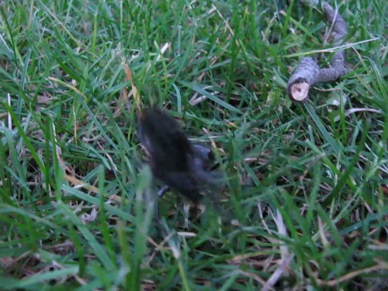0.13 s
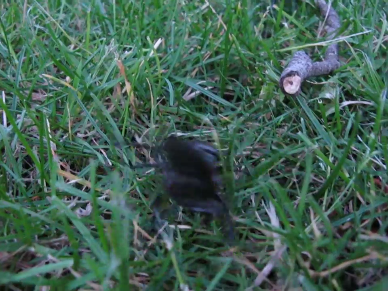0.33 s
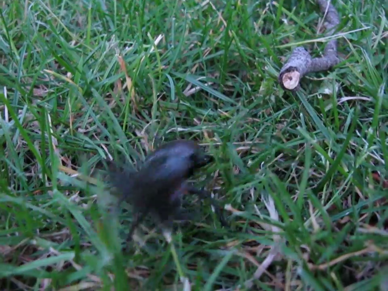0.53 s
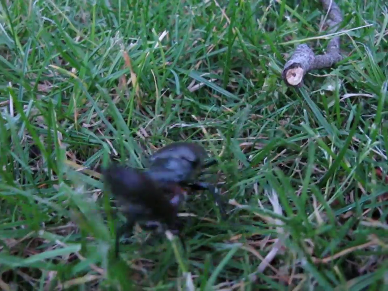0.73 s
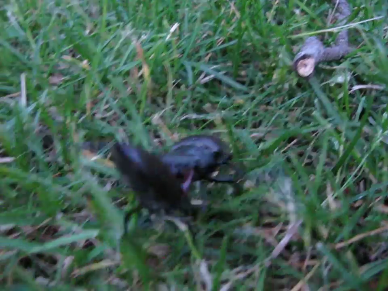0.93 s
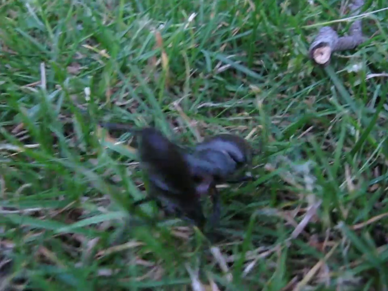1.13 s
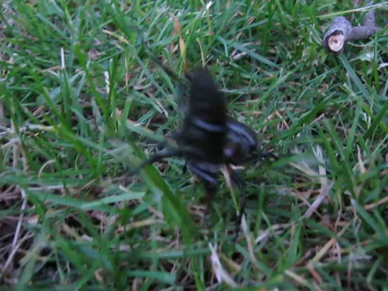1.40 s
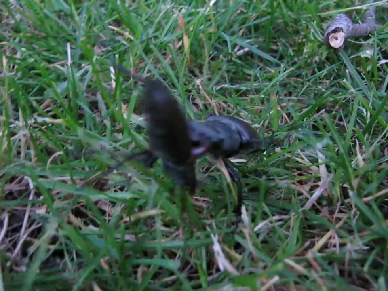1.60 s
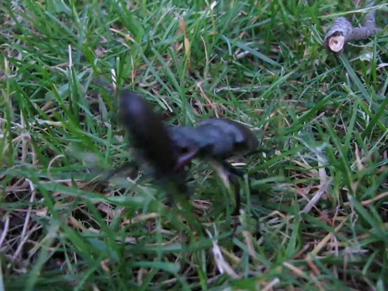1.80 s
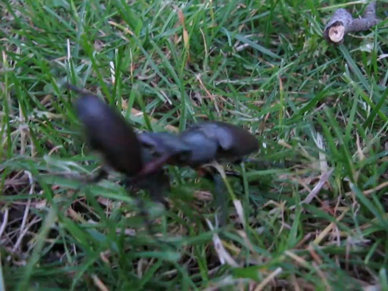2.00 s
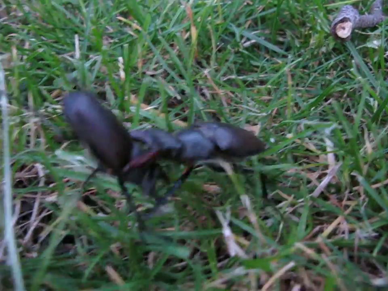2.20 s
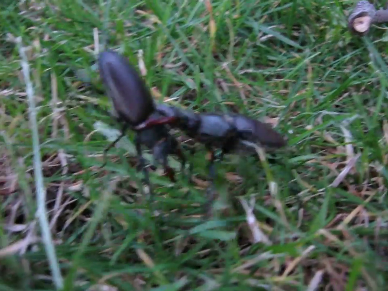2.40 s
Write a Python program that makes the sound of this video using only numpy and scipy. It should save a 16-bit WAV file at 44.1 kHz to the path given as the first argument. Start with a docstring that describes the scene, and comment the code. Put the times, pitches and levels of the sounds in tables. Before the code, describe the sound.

Two beetles knock together sharply once, followed by tiny dry clicks and light grass rustles

```python
"""On a lawn, two stag beetles wrestle close by.
Knocks and clicks are struck shell modes, each rebounding about half to one millisecond later,
with a short noisy scatter and a low noise tail from the turf. Legs snap blades (high damped modes)
and brush the grass (dense random grains).
Behind them lie a soft outdoor hiss of coloured noise and a faint electronic whine of sine tones."""
import sys
import numpy as np
from scipy import signal
from scipy.fft import rfft, irfft
from scipy.io import wavfile
from scipy.ndimage import uniform_filter1d

SR = 44100
rng = np.random.default_rng(int(sys.argv[2]) if len(sys.argv) > 2 else 0)


def unload_wav(signal):
    """Save mono or channel-first audio to the path in sys.argv[1] as 16-bit WAV at rate SR, clipped to [-1, 1]."""
    wavfile.write(
        sys.argv[1],
        SR,
        np.round(np.clip(np.atleast_2d(signal).T, -1, 1) * 32767).astype(np.int16),
    )


N = 112454
T = np.arange(N) / SR  # time in seconds


def undb(db):
    """Decibels to gain."""
    return 10 ** (np.asarray(db) / 20)


def unit(x):
    """Scale to rms 1."""
    return x / np.sqrt(np.mean(x ** 2) + 1e-20)


def colour(x, points):
    """Shape the spectrum of x through (Hz, dB) points joined on a log frequency axis, at rms 1."""
    point_hz, point_db = np.array(points, float).T
    bin_hz = np.maximum(np.arange(N // 2 + 1) * SR / N, 1)
    gain = undb(np.interp(np.log(bin_hz), np.log(point_hz), point_db))
    return unit(irfft(rfft(x) * gain, N))


def noise(points):
    """Coloured noise at rms 1."""
    return colour(rng.standard_normal(N), points)


def walk(rate):
    """A smooth random wander at rms 1, with about `rate` new values a second."""
    hold = int(SR / rate)
    steps = np.repeat(rng.standard_normal(N // hold + 1), hold)
    return unit(uniform_filter1d(steps, hold)[:N])


def decay(start, t60):
    """Silence until start, then a fall of 60 dB in t60 seconds."""
    fall = np.clip((T - start) / t60, 0, 10)
    return (T >= start) * np.exp(-np.log(1000) * fall)


def ring(start, modes):
    """Damped sine modes struck at start."""
    return sum(undb(db) * decay(start, t60) * np.sin(2 * np.pi * hz * (T - start))
               for hz, db, t60 in modes)


def grains(rate, spread_db):
    """Random impulses of either sign at `rate` per second, mostly small and a few large."""
    size_db = spread_db * np.minimum(rng.exponential(size=N), 4)
    size = undb(size_db) * rng.choice([-1, 1], N)
    return (rng.random(N) < rate / SR) * size


def cut(x, hz, kind):
    """A gentle two-pole low-pass or high-pass."""
    return signal.sosfilt(signal.butter(2, hz, kind, fs=SR, output="sos"), x)


# Dull knocks of the hard bodies. Each row: start in seconds, level in dB, pitch ratio,
# treble edge of the first touch in Hz, rebound delay in ms, rebound in dB relative to the touch,
# scatter level in dB.
KNOCKS = [(.2494, 1, 1.018, 3130, 1.033, -5, -26), (1.0406, -17.5, 1.26, 3480, 0.63, -22, -39)]
# Brighter clicks of the jaws. Each row: the same columns and units as the knocks.
CLICKS = [(1.3744, -32, 1, 13000, 1.1, -9.5, -38.5), (2.2532, -44.5, 0.91, 15000, 0.47, -17, -65),
          (2.3222, -32.5, 0.993, 13000, 1.07, -10, -47.5)]
# Shell modes of a knock. Each row: frequency in Hz before the pitch ratio, level in dB, t60 in seconds.
KNOCK_MODES = [(620, -32, 0.0092), (1025, -7.5, 0.0044), (1730, -11.5, 0.0048), (2150, -24, 0.003),
               (3670, -30, 0.0042), (4830, -11, 0.0066), (5350, -20.5, 0.0025), (6380, -15, 0.0034),
               (8800, -16.5, 0.0027), (12500, -24, 0.0056)]
# Shell modes of a click. Each row: frequency in Hz before the pitch ratio, level in dB, t60 in seconds.
CLICK_MODES = [(700, 0, 0.0095), (1810, -9, 0.022), (2230, -9, 0.022), (3710, -6, 0.011), (4860, -7, 0.014),
               (5600, -14, .006), (6170, -5, .007), (7530, -11, 0.0068), (8500, -11, 0.0033),
               (13000, -2, .002)]
# Spectrum of the scatter after a contact. Each row: frequency in Hz, density in dB per Hz.
SCATTER = [(100, -3), (300, 3.5), (900, 9), (1800, 5), (3600, 2), (5000, -4), (6200, -9), (7700, -20.5),
           (9500, -9.5), (13000, -13), (16000, -38)]
# Spectrum of the turf's low answer. Each row: frequency in Hz, density in dB per Hz.
TURF = [(50, -18), (150, 2.5), (330, 4), (650, 0), (1100, -20), (3000, -70)]
SCATTER_T60_S, TAIL_RISE_S = 0.036, 0.00028
TURF_DB, TURF_T60_S = -15.5, .11  # level relative to the scatter
SHELL_LOW_HZ, SHELL_TOP_HZ = 530, 13600  # small bodies radiate little below the low edge


def contacts(table, modes):
    """Shell meets shell softly, then rebounds with a sharp edge; scatter and a lower, longer turf tail follow."""
    shell, tail = np.zeros(N), np.zeros(N)
    scatter, turf = noise(SCATTER), noise(TURF)
    for start, db, pitch, edge_hz, rebound_ms, rebound_db, scatter_db in table:
        tuned = [(hz * pitch, mode_db, t60) for hz, mode_db, t60 in modes]
        touch = cut(ring(start, tuned), edge_hz, "low")
        rebound = undb(rebound_db) * ring(start + rebound_ms / 1000, tuned)
        shell += undb(db) * (touch + rebound)

        after = scatter * decay(start, SCATTER_T60_S)
        after += undb(TURF_DB) * turf * decay(start, TURF_T60_S)
        rise = np.clip((T - start) / TAIL_RISE_S, 0, 1)
        tail += undb(scatter_db) * after * rise
    shell = cut(shell, SHELL_LOW_HZ, "high")
    return cut(shell, SHELL_TOP_HZ, "low") + tail


# Grass blades snapping under the feet. Each row: start in seconds, level in dB, nominal pitch in Hz.
TICKS = [(0.187, -46, 13200), (.2678, -45, 11500), (.5568, -49, 11500), (0.619, -44, 12000),
         (.8356, -43.5, 12800), (1.1452, -53, 9500), (1.2101, -33.5, 10600), (1.7760, -54, 11500),
         (1.8002, -43.5, 12100), (1.9552, -48, 12500), (2.0028, -46, 12500), (2.2538, -39, 10000),
         (2.3140, -49, 12000), (2.3689, -46, 12500)]
# What a blade rings with. Each row: multiple of its nominal pitch, level in dB, t60 in seconds.
BLADE_MODES = [(.72, -15, .0025), (.93, 3, 0.002), (1.25, -2.5, .0018)]
# Crackle of grass fibres, also heard in the rustle. Each row: frequency in Hz, density in dB per Hz.
CRACKLE = [(2000, 8), (6000, 1), (10000, -17), (12500, 12), (16000, -10)]
CRUMBLE_DB, CRUMBLE_T60_S = -9, .009  # fibres giving way after a snap
BLADE_LOW_HZ = 7500  # thin blades radiate little below this


def snaps():
    """Each blade gives one thin, high tick of damped modes and crumbles briefly in noise."""
    out, fibres = np.zeros(N), noise(CRACKLE)
    for start, db, hz in TICKS:
        tuned = [(hz * ratio, mode_db, t60) for ratio, mode_db, t60 in BLADE_MODES]
        crumble = undb(CRUMBLE_DB) * fibres * decay(start, CRUMBLE_T60_S)
        out += undb(db) * (ring(start, tuned) + crumble)
    return cut(out, BLADE_LOW_HZ, "high")


# Legs brushing the grass. Each row: start in seconds, length in seconds, level in dB.
BRUSHES = [(1.0367, 0.016, -50.5), (1.045, 0.082, -63), (1.120, .031, -54.5), (1.136, 0.062, -53.5),
           (1.24, .05, -63), (1.832, .035, -60.5), (1.98, .025, -64), (2.307, 0.027, -61)]
# Spectrum of the brushing. Each row: frequency in Hz, density in dB per Hz.
BRUSH = [(500, 4), (1000, 4.5), (3000, -4.5), (5800, 1), (6800, -5), (7700, 1), (8500, -1.5), (9150, 5),
         (9900, -5), (11000, -5), (12300, 1), (13200, -7), (14000, -1), (14800, -9), (16000, -14)]
BRUSH_RISE_SHARE, BRUSH_RELEASE_S = 0.41, .0025  # the rise is a share of the stroke's length
BRUSH_GRAINS_PER_S, BRUSH_SPREAD_DB = 2000, 2.5
CRACKLE_PER_S, CRACKLE_DB, CRACKLE_SPREAD_DB = 120, -72, 1.5


def rustle():
    """Legs drag over blades in dense tiny slips that swell and let go; sparse crackles go on throughout."""
    pressure = np.zeros(N)
    for start, length, db in BRUSHES:
        swell = (T - start) / (BRUSH_RISE_SHARE * length)
        release = (start + length - T) / BRUSH_RELEASE_S
        pressure += undb(db) * np.clip(np.minimum(swell, release), 0, 1)
    slips = colour(grains(BRUSH_GRAINS_PER_S, BRUSH_SPREAD_DB), BRUSH)
    crackles = colour(grains(CRACKLE_PER_S, CRACKLE_SPREAD_DB), CRACKLE)
    return pressure * slips + undb(CRACKLE_DB) * crackles


# Spectrum of the outdoor hiss. Each row: frequency in Hz, density in dB per Hz.
AIR = [(20, -14), (50, -4), (130, -1.5), (320, 0.5), (700, -1.2), (1400, -6), (2400, -9), (4000, -12.5),
       (8500, -17), (12800, -20), (14200, -23), (16000, -27.5)]
AIR_DB, AIR_FLICKER_DB, AIR_FLICKER_PER_S = -53, .5, 18


def air():
    """A nearly even outdoor hiss whose level flickers slightly."""
    level_db = AIR_DB + AIR_FLICKER_DB * walk(AIR_FLICKER_PER_S)
    return noise(AIR) * undb(level_db)


# Electronic whine, lowest line first. Each row: frequency in Hz, rms level in dB.
WHINE = [(4800, -70.5), (9600, -82), (14400, -81.5)]
HAZE_DB, HAZE_WANDER_PER_S = -81, 140


def whine():
    """A faint electronic tone with two overtones; random wander widens its lowest line into a haze."""
    lines = sum(undb(db) * np.sqrt(2) * np.sin(2 * np.pi * hz * T) for hz, db in WHINE)
    lowest_hz = WHINE[0][0]
    haze = unit(walk(HAZE_WANDER_PER_S) * np.sin(2 * np.pi * lowest_hz * T))
    return lines + undb(HAZE_DB) * haze


def scene():
    """Beetles, grass and background in one channel."""
    beetles = contacts(KNOCKS, KNOCK_MODES) + contacts(CLICKS, CLICK_MODES)
    grass = snaps() + rustle()
    background = air() + whine()
    return (beetles + grass + background)[None]


START_S, TOP_HZ = .036, 16000


def record(dry):
    """The sound opens after a moment of silence; a steep low-pass cuts the top."""
    opened = dry * (T >= START_S)
    return signal.sosfilt(signal.ellip(10, .1, 80, TOP_HZ, fs=SR, output="sos"), opened)


dry = scene()
out = record(dry)
unload_wav(out)
```